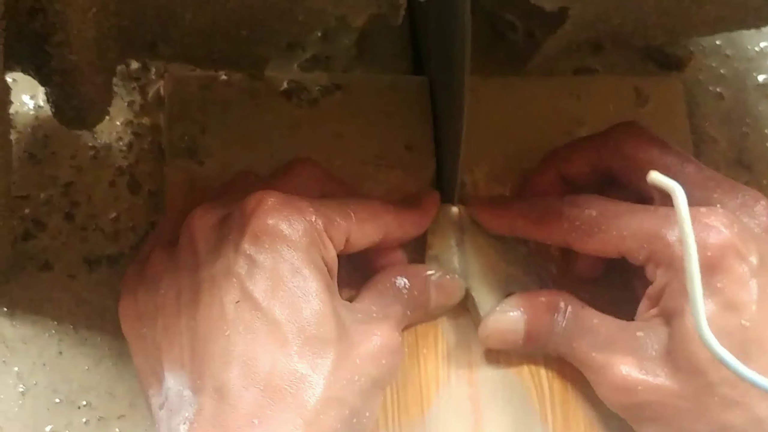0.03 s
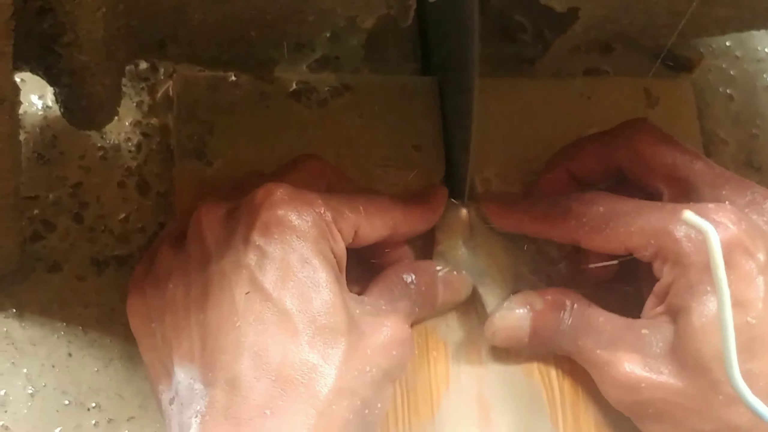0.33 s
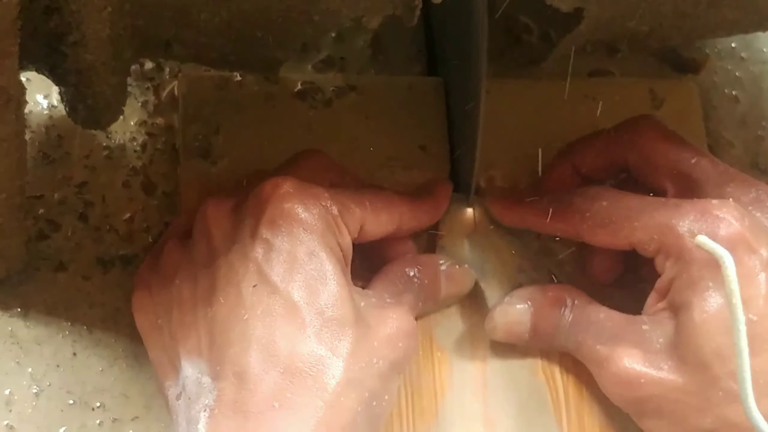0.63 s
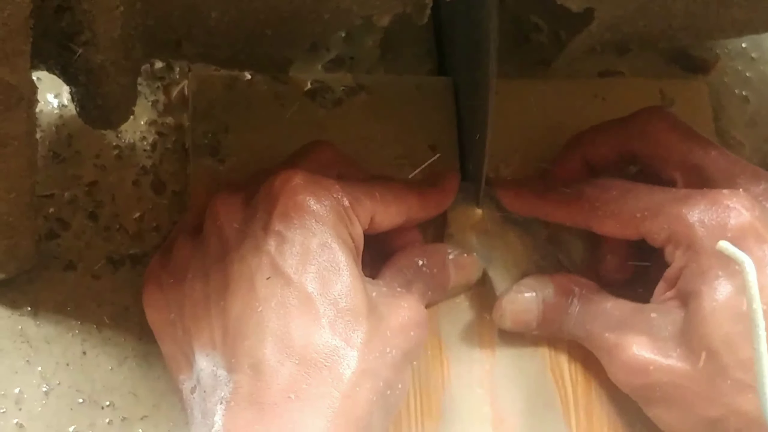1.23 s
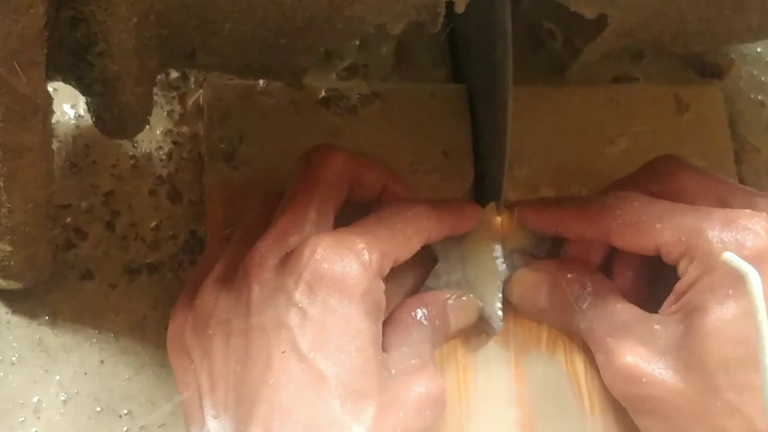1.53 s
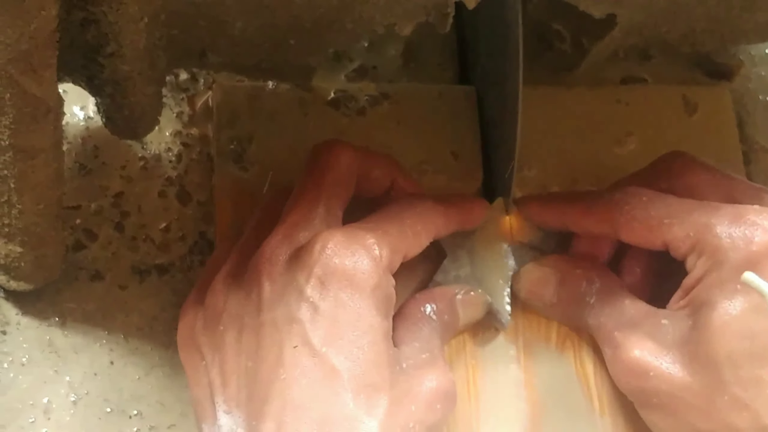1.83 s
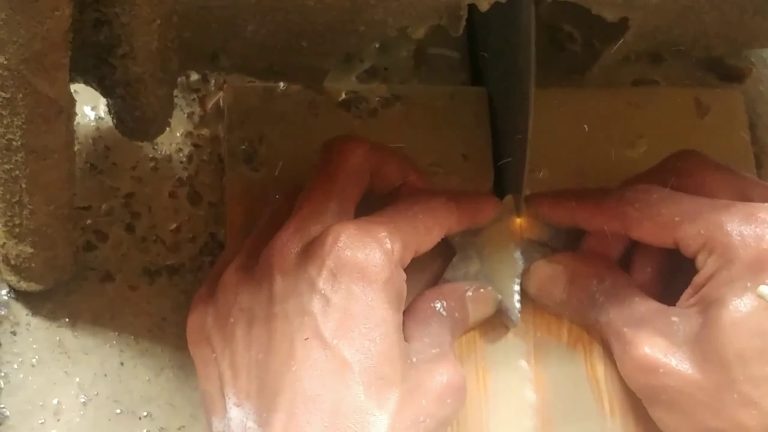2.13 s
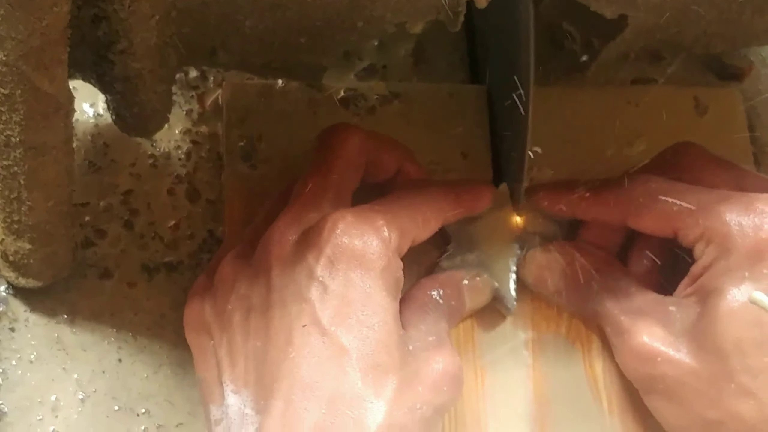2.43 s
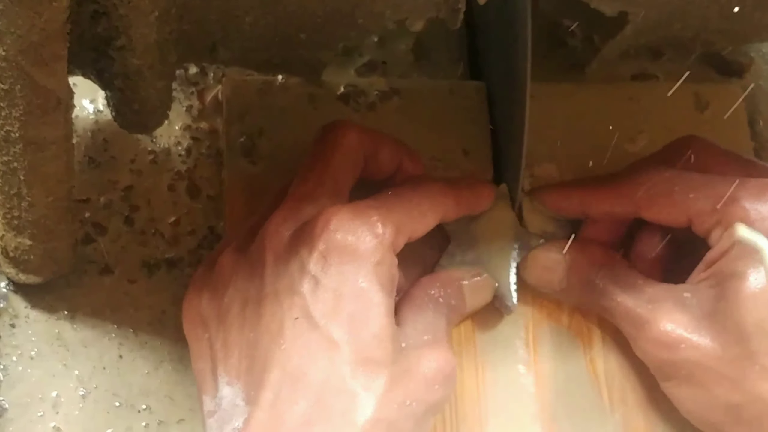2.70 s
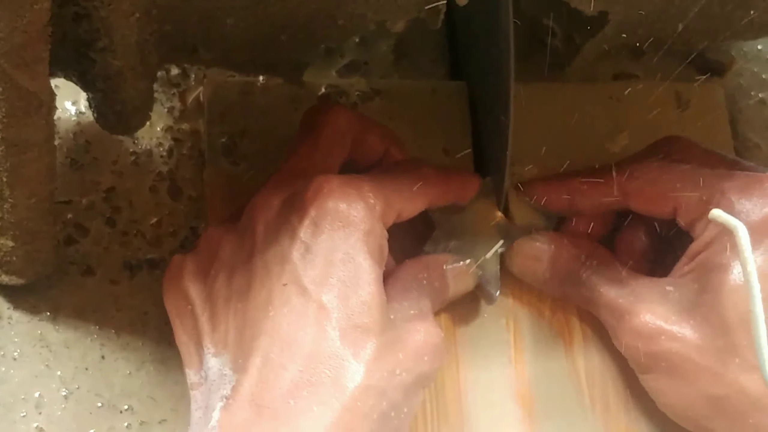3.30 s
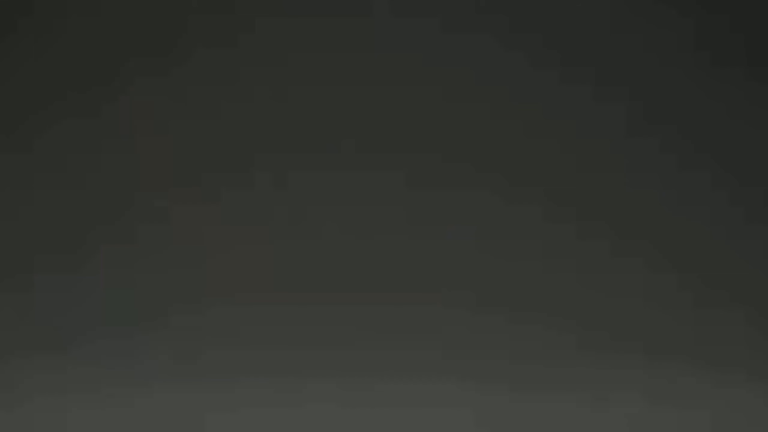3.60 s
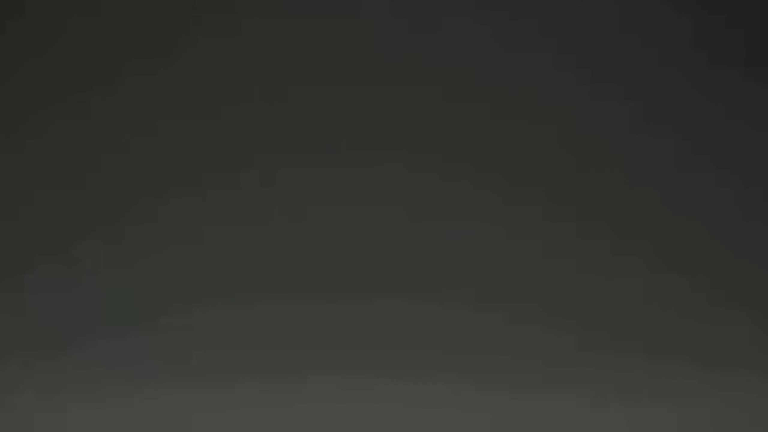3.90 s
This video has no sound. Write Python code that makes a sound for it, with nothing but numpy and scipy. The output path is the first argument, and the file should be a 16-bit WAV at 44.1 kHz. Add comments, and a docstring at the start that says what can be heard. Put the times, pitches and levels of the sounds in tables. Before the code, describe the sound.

Close, steady grinding of stone on a wet motorised wheel, droning and squealing over spray hiss.

```python
"""A hand-held stone grinds against a wet wheel turning about 26 times a second, heard close up.
The rim's grain passes the stone on every turn and rings stone, wheel and machine; its pattern wears
slowly and changes when the grip shifts. At times the stone bounces in step with the wheel and drones,
or squeals. Grit rasps and spray hisses over a faint motor hum. The sound fades in and out."""
import sys
import numpy as np
from scipy import signal
from scipy.fft import rfft, irfft, next_fast_len
from scipy.io import wavfile
from scipy.ndimage import uniform_filter1d, map_coordinates

SR = 44100
rng = np.random.default_rng(int(sys.argv[2]) if len(sys.argv) > 2 else 0)


def store_pcm(level_fs):
    """Save levels as 16-bit WAV."""
    pcm = np.round(np.clip(level_fs, -1, 1) * 32767).astype(np.int16)
    wavfile.write(sys.argv[1], SR, np.atleast_2d(pcm).T)


N = 174195

# The wheel's speed, sagging when the stone is pressed. Each row: time in seconds, turns per second.
WHEEL_SPEED = [(.25, 25.95), (.6, 25.62), (1.0, 25.55), (1.3, 25.72), (1.55, 26.3), (1.75, 25.9),
               (2.3, 25.97), (2.52, 26.8), (2.72, 27.1), (3.05, 27.05), (3.3, 26.9), (3.7, 26.92)]
# The level ride of rasp and spray. Each row: time in seconds, relative level in dB.
GRIT_LEVEL = [(0.27, -18.5), (0.32, -20), (0.83, -18.5), (1.38, -19.5), (1.4, -16), (1.61, -19),
              (1.72, -16.5), (1.78, -18.5), (2.72, -18.5), (2.79, -23), (2.8, -19), (3.72, -16)]
STONE_APART, BODY_APART = 0.25, 0.075  # share of the contact force that differs between the ears


def grinding(turns):
    """The rim's grain rings stone and wheel where they meet, over a broad scrape."""
    # Resonances. Each row: pitch in Hz, width in Hz, relative level in dB, left over right in dB.
    stone_modes = [(2315, 25, 4.5, -12)]
    edge_modes = [(2438, 82, 1, -14.5), (2517, 65, -0.5, -6)]  # the wheel's thin edge
    disc_modes = [(1656, 23, 1, -6.5), (1764, 47, 0, -3), (1853, 70, -12, -10.5), (1930, 53, -4, -13.5),
                  (2057, 86, -9.5, -18.5), (2726, 27, -10, -2.5), (2827, 48, -1.5, -14.5),
                  (3027, 114, -6, -9.5), (3236, 23, -1, -9.5)]
    tip_modes = [(2885, 70, 0.5, -10), (3130, 50, 0, -7), (3290, 38, -3, -6.5), (3665, 42, 2, -5.5),
                 (4400, 70, -9, -1), (5060, 61, -1, -1.5)]  # the stone's upper modes, ringing while its tip is in the wheel
    # Level rides. Each row: time in seconds, relative level in dB.
    stone_level = [(.27, -23), (.4, -24), (.55, -24), (.8, -25.5), (1.2, -22.5), (1.6, -23.5), (1.75, -21),
                   (2.2, -21.5), (2.45, -23.5), (2.85, -28), (3.0, -23), (3.3, -25), (3.72, -27.5)]
    edge_level = [(0.27, -23.5), (1.09, -24.5), (1.7, -18), (1.72, -23), (2.71, -20.5), (2.8, -23.5),
                  (3.01, -21.5), (3.37, -23.5), (3.43, -18.5), (3.72, -22)]
    tip_level = [(.3, -38), (2.3, -36), (2.5, -26), (3.1, -26), (3.3, -37), (3.72, -39)]
    scrape_level = [(0.27, -22), (0.29, -23), (0.44, -22), (2.28, -22), (2.31, -22), (2.83, -27),
                    (3.25, -23.5), (3.53, -26.5), (3.72, -26)]
    # The scrape's colour. Each row: frequency in Hz, gain in dB.
    scrape_eq = [(300, -24.5), (410, -12.5), (520, 6.5), (900, -1), (1250, -1.5), (1700, -4), (2600, -4),
                 (3500, -6.5), (4500, -10), (7000, -32.5)]
    swell = undb(2 * np.cos(2 * np.pi * turns))  # the wheel's high spot, once a turn
    stone = ring(swell * contact(turns, STONE_APART, loose=0.27), stone_modes, band_hz=(2200, 2500))
    edge = ring(swell * contact(turns, STONE_APART, loose=0.45), edge_modes, band_hz=(2370, 2620))
    disc = ring(contact(turns, STONE_APART, loose=0.51), disc_modes, band_hz=(1520, 3480))
    tip = ring(contact(turns, STONE_APART, loose=0.53), tip_modes, band_hz=(2800, 5400))
    friction = contact(turns, apart=0.42, loose=0.52)
    scrape = unit(filtered(friction, undb(shape(scrape_eq)))) * pan(4)
    return (stone * undb(3 + curve(stone_level))
            + edge * undb(3.5 + curve(edge_level))
            + tip * undb(curve(tip_level))
            + (disc * undb(6) + scrape * undb(4)) * undb(curve(scrape_level)))


def contact(turns, apart, loose):
    """Force on the stone: the rim's grain, which repeats, and a share of loose grit, which does not."""
    grain = np.array([rim(turns, count=1600) for _ in range(3)])
    grit = rng.standard_normal((3, N))
    return ears(np.sqrt(1 - loose) * grain + np.sqrt(loose) * grit, apart)


def rim(turns, count):
    """A random profile of count points round the wheel passes the stone, a little worn on every turn."""
    # How the pattern lasts. Each row: time in seconds, share that survives one turn.
    survival = [(.3, 0.91), (1.45, 1), (1.62, 0.63), (1.75, 0.92), (2.33, 0.9), (2.5, 0.71), (2.85, 0.85),
                (3.1, 0.81), (3.7, 0.89)]
    turn_count = int(N / SR * np.max(np.array(WHEEL_SPEED)[:, 1])) + 3
    profile = rng.standard_normal((turn_count, count))
    kept = np.clip(np.interp(np.arange(turn_count), turns, curve(survival)), 0, .99)
    for k in range(1, turn_count):
        profile[k] = kept[k] * profile[k - 1] + np.sqrt(1 - kept[k] ** 2) * profile[k]
    return map_coordinates(profile.ravel(), [turns * count], order=3, mode="nearest")


def machine(turns):
    """The rough rim shakes the machine's body, the wheel's mounting, the work rest and the guard."""
    # Resonances. Each row: pitch in Hz, width in Hz, relative level in dB, left over right in dB.
    body_modes = [(486.4, 34, -4, 6), (518, 44, -1.5, 2.5), (564.3, 55, 0, 3)]
    mount_modes = [(623, 24, 0, 0), (699, 33, -1, 4), (809, 79, -12, 15)]
    rest_modes = [(1048, 43, 1.5, 6.5), (1102, 81, -5, 7.5)]
    guard_modes = [(1350, 28, -0.5, -2), (1409, 71, -4, 9), (1458, 23, 1.5, 3)]
    # Level rides. Each row: time in seconds, relative level in dB.
    body_level = [(.27, -24), (.53, -20.5), (1.0, -22.5), (1.55, -22), (1.72, -23), (2.05, -22.5),
                  (2.4, -23.5), (2.6, -23.5), (2.8, -24), (3.05, -21.5), (3.5, -22), (3.72, -22)]
    mount_level = [(0.27, -28.5), (0.38, -23), (1.6, -22.5), (2.3, -24), (2.55, -21), (2.83, -24),
                   (3.0, -21.5), (3.35, -21), (3.72, -23.5)]
    rest_level = [(.27, -22.5), (.55, -19), (.8, -23.5), (1.25, -22.5), (1.6, -20.5), (2.33, -20),
                  (2.5, -22), (2.8, -28), (3.05, -25), (3.72, -23.5)]
    guard_level = [(0.27, -20), (0.38, -24), (0.8, -20), (2.49, -24), (2.62, -23.5), (2.74, -23),
                   (2.95, -23.5), (3.1, -23.5), (3.72, -22.5)]
    body = ring(contact(turns, BODY_APART, loose=0.2), body_modes, band_hz=(449, 672))
    mount = ring(contact(turns, BODY_APART, loose=0.41), mount_modes, band_hz=(580, 940))
    rest = ring(contact(turns, apart=0.44, loose=0.3), rest_modes, band_hz=(930, 1210))
    guard = ring(contact(turns, apart=0.38, loose=0.31), guard_modes, band_hz=(1266, 1520))
    return (body * undb(3.5 + curve(body_level))
            + mount * undb(2.5 + curve(mount_level))
            + rest * undb(1.5 + curve(rest_level))
            + guard * undb(-1.5 + curve(guard_level)))


def knock(turns):
    """A short ridged patch of the rim passes the stone once a turn and knocks the machine."""
    # The knock's resonance. Each row: pitch in Hz, width in Hz, gain in dB, left over right in dB.
    knock_modes = [(1089, 37, 0, 8.5)]
    # Its level ride. Each row: time in seconds, level in dB.
    knock_level = [(.3, -26.5), (.55, -23.5), (.7, -16.5), (1.22, -15.5), (1.5, -21), (1.8, -24.5),
                   (2.33, -24), (2.45, -36)]
    half_length_turns, ridges_per_turn = .16, 42.7
    from_centre = (turns + .5) % 1 - .5
    patch = np.exp(-(from_centre / half_length_turns) ** 2)
    ridges = np.sin(2 * np.pi * ridges_per_turn * from_centre + 0.068 * walk(25))
    return ring(patch * ridges, knock_modes, band_hz=(850, 1400)) * undb(curve(knock_level))


def drones(turns):
    """The stone bounces a whole number of times a turn, so each drone follows the wheel's speed."""
    # Each row: start and length in seconds, rough pitch in Hz, level in dB, left over right in dB.
    drone_cues = [(.3, 0.83, 461, -29, 4), (0.346, .95, 590, -29, 4), (1.61, 0.81, 493, -22.5, 7.5),
                  (1.681, 0.82, 519, -21, 4), (1.696, 0.65, 571, -29, 6), (1.684, 0.56, 726, -27, 0),
                  (2.397, 0.25, 481, -24, 6), (2.4, 0.26, 721, -23.5, 4), (2.617, 0.49, 623, -21.5, 8),
                  (2.616, 0.43, 704, -26, 3), (2.92, 0.98, 484, -27, 8.5), (3.264, 0.45, 511, -19.5, 5)]
    out = 0
    for start, length, hz, db, side in drone_cues:
        bounces = np.round(hz / np.interp(start + length / 2, *np.array(WHEEL_SPEED).T))
        tone = sine(bounces * turns, phase=rng.uniform(0, 2 * np.pi) + .12 * walk(20))
        level = undb(db + .9 * walk(14))
        out = out + pan(side) * gate(start, length, edge_s=0.056) * level * tone
    return out


def squeals(turns):
    """The contact locks on to a mode for a moment and sings, gliding and throbbing with the wheel."""
    # Each row: start and length in seconds, first and last pitch in Hz, level in dB,
    # left over right in dB.
    squeal_cues = [(0.243, .22, 2340, 2290, -19.5, -7), (0.248, 0.96, 1930, 1940, -30, -15),
                   (.44, 0.24, 2288, 2312, -25.5, -8), (1.201, 0.46, 2298, 2330, -19.5, -6),
                   (2.647, 0.38, 1462, 1466, -27, 7.5), (2.647, .33, 1636, 1640, -28, -5),
                   (2.879, .87, 2422, 2452, -25.5, -11.5), (3.102, 0.632, 2328, 2352, -26.5, -6),
                   (3.334, 0.5, 2503, 2530, -25.5, -8)]
    out = 0
    for start, length, first_hz, last_hz, db, side in squeal_cues:
        cycles = np.cumsum(curve([(start, first_hz), (start + length, last_hz)])) / SR
        level = undb(db + 0.5 * (walk(60) + np.cos(2 * np.pi * turns)))
        tone = sine(cycles, phase=0.5 * walk(35))
        out = out + pan(side) * gate(start, length, edge_s=.05) * level * tone
    return out


def rasp(turns):
    """Coarse grains in the rim scratch the stone, in much the same rhythm on every turn."""
    # The rasp's colour. Each row: frequency in Hz, gain in dB.
    rasp_eq = [(2500, -29), (3600, 0), (5200, 0.5), (6500, -5), (8500, -29)]
    grains = undb(3.5 * rim(turns, count=60))
    noise = ears(rng.standard_normal((3, N)), apart=0.92)
    scratch = filtered(grains * noise, undb(shape(rasp_eq)))
    return unit(scratch) * undb(-7.5 + curve(GRIT_LEVEL))


def spray(turns):
    """Tiny bursts of grit and water thrown off the rim merge into a hiss, different at each ear."""
    # The hiss's colour. Each row: frequency in Hz, gain in dB.
    hiss_eq = [(1500, -21), (3200, 4), (4500, 2), (6500, 2), (7900, 1), (8450, -4.5), (9000, -20),
               (9700, -2), (10500, 0.5), (12500, 1), (14500, 3.5), (15500, 2.5)]
    # Its balance. Each row: frequency in Hz, left over right in dB.
    hiss_pan = [(3000, -9), (4500, -3.5), (6800, 0.5), (8200, -9), (10500, -6.5), (12000, -1.5), (14000, 2),
                (15500, -7)]
    ripple_db, ripple_step_hz = 2.6, 70  # fine random peaks and dips in each ear's colour
    swell_db = 0.92 * np.cos(2 * np.pi * turns)  # the wheel's high spot
    bursts = undb(walk(2500) + 0.9 * walk(30.14) + swell_db)
    ripple = np.array([np.interp(bins() / ripple_step_hz, np.arange(len(row)), row)
                       for row in rng.standard_normal((2, 400))])
    colour = undb(shape(hiss_eq) + ripple_db * ripple) * pan(shape(hiss_pan))
    hiss = filtered(bursts * ears(rng.standard_normal((3, N)), apart=1), colour)
    return unit(hiss) * undb(4 + curve(GRIT_LEVEL))


def motor(turns):
    """Motor and spindle hum with a slight waver over their rumble."""
    # The motor's hum. Each row: pitch in Hz, level in dB.
    hum_tones = [(100.5, -46)]
    # The spindle's level ride. Each row: time in seconds, level in dB.
    spindle_level = [(.27, -37), (.45, -41.5), (.6, -29.5), (.72, -39), (1.1, -38), (1.3, -44.5),
                     (1.42, -33.5), (1.6, -42), (2.8, -47.5), (3.72, -37.5)]
    # The rumble's colour. Each row: frequency in Hz, gain in dB.
    rumble_eq = [(20, -12.5), (45, -10.5), (80, -5), (125, -1.5), (190, 2.5), (250, 4.5), (310, -2.5),
                 (380, 3.5), (460, -10), (700, -36)]
    t = np.arange(N) / SR
    hum = sum(undb(db + 2.5 * walk(9)) * sine(hz * t, phase=.5 * walk(6.3)) for hz, db in hum_tones)
    spindle_gain = undb(curve(spindle_level) + 1.5 * walk(22))
    spindle = spindle_gain * sine(6 * turns, phase=.4 * walk(8.6))  # six cycles a turn
    rumble = unit(filtered(contact(turns, BODY_APART, loose=0.51), undb(shape(rumble_eq))))
    return (hum + spindle + undb(-32) * rumble) * pan(5.5)


def ring(force, modes, band_hz):
    """Ring damped modes that radiate only within a band, at an even strength."""
    window_s = 0.14  # loudness is held steady over this window, so the level ride sets the strength
    f = bins()
    low_hz, high_hz = band_hz
    response = sum(pan(side) * undb(db) / (1 + 1j * (f / hz - hz / f) * hz / width)
                   for hz, width, db, side in modes)
    band = 1 / np.sqrt((1 + (low_hz / f) ** 20) * (1 + (f / high_hz) ** 20))
    ringing = filtered(force, response * band)
    power = uniform_filter1d(np.mean(ringing ** 2, axis=0), int(window_s * SR))
    return ringing / np.sqrt(power + 1e-18)


def undb(db):
    """Decibels to gain."""
    return 10 ** (np.asarray(db) / 20)


def unit(x):
    """Scale to rms 1."""
    return x / np.sqrt(np.mean(x ** 2))


def sine(cycles, phase):
    """A tone of rms 1, its phase shifted in radians."""
    return np.sqrt(2) * np.sin(2 * np.pi * cycles + phase)


def curve(rows):
    """Join (seconds, value) rows by straight lines."""
    return np.interp(np.arange(N) / SR, *np.array(rows).T)


def gate(start, length, edge_s):
    """Rise, hold and fall."""
    t = np.arange(N) / SR
    return np.clip(np.minimum(t - start, start + length - t) / edge_s, 0, 1)


def walk(rate_hz):
    """A smooth random drift of rms 1."""
    hold = max(int(SR / rate_hz), 2)
    steps = np.repeat(rng.standard_normal(N // hold + 1), hold)
    return unit(uniform_filter1d(uniform_filter1d(steps, hold), hold)[:N])


def pan(db):
    """Left and right gains for a level difference."""
    return undb(np.array([[.5], [-.5]]) * db)


def ears(three, apart):
    """Mix one common sound and two separate ones into left and right."""
    return np.sqrt(1 - apart) * three[0] + np.sqrt(apart) * three[1:]


def bins():
    """Frequencies in Hz on which the filters work."""
    return np.maximum(np.fft.rfftfreq(next_fast_len(N, True), 1 / SR), 1)


def shape(rows):
    """Join (Hz, value) rows on a log-frequency axis."""
    hz, value = np.array(rows).T
    return np.interp(np.log(bins()), np.log(hz), value)


def filtered(x, response):
    """Pass a sound through a frequency response."""
    size = next_fast_len(N, True)
    return irfft(rfft(x, size) * response, size)[..., :N]


def scene():
    """One turning wheel drives the layers; the rings reach two microphone ports at different times."""
    # Phase between the ports. Each row: frequency in Hz, the left's lead in radians.
    port_phase = [(100, -0.5), (780, 0.41), (1100, -0.1), (1720, -2), (2240, -6), (2580, -5.5), (3270, -9),
                  (4300, -10.5)]
    patch_s = .992  # a moment when the ridged patch is under the stone
    turns = np.cumsum(curve(WHEEL_SPEED)) / SR
    turns = turns + 1 - np.interp(patch_s * SR, np.arange(N), turns) % 1
    ports = np.exp(1j * shape(port_phase) * np.array([[.5], [-.5]]))
    ringing = grinding(turns) + machine(turns) + knock(turns) + drones(turns) + squeals(turns)
    return filtered(ringing, ports) + rasp(turns) + spray(turns) + motor(turns)


def record(dry):
    """Round the peaks, fade in and out and cut the top."""
    # The master fade. Each row: time in seconds, gain in dB.
    fade = [(0, -90), (.07, -72), (.11, -42.5), (.165, -31.5), (.2, -11), (.245, 0.5), (3.73, 0),
            (3.79, -14), (3.845, -27.5), (3.865, -95), (3.95, -100)]
    ceiling, top_hz = 1.02, 15550
    rounded = ceiling * np.tanh(dry / ceiling)
    high_cut = signal.ellip(10, .2, 70, top_hz, fs=SR, output="sos")
    return signal.sosfilt(high_cut, rounded * undb(curve(fade)))


dry = scene()
out = record(dry)
store_pcm(out)
```